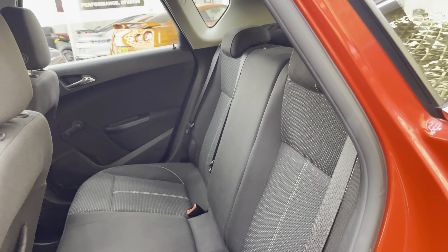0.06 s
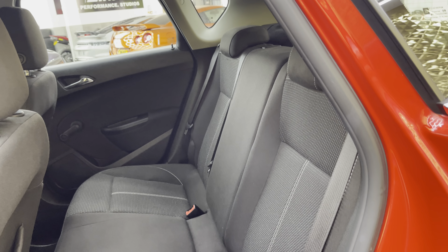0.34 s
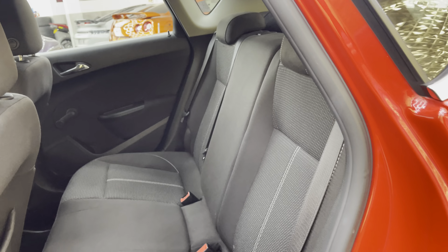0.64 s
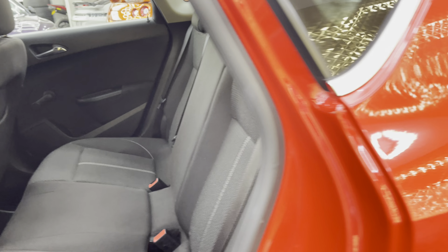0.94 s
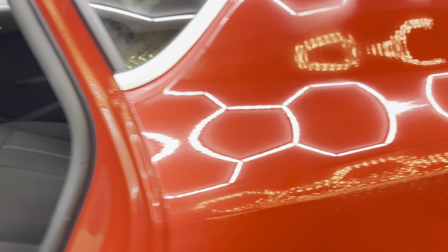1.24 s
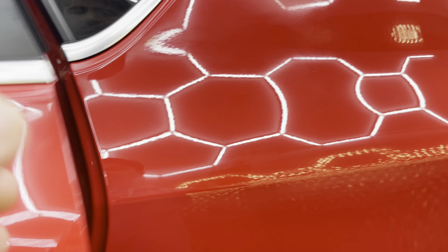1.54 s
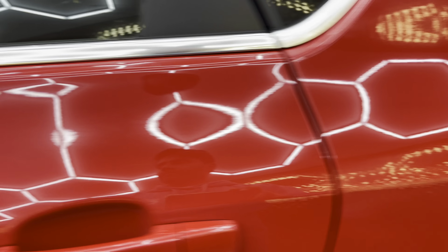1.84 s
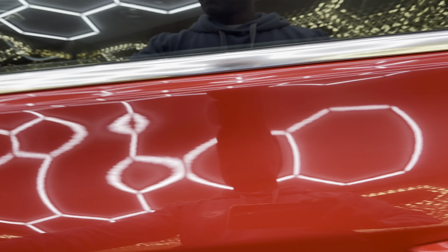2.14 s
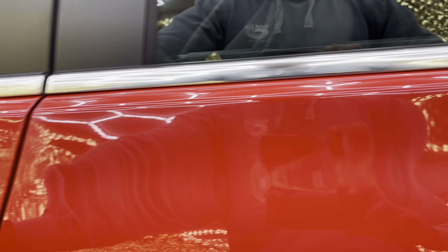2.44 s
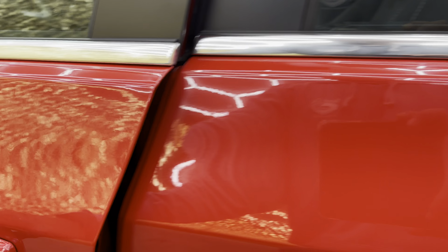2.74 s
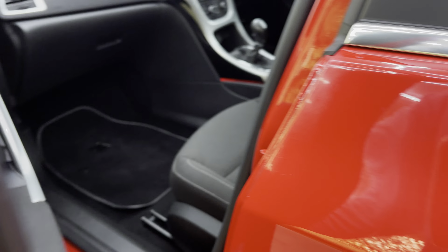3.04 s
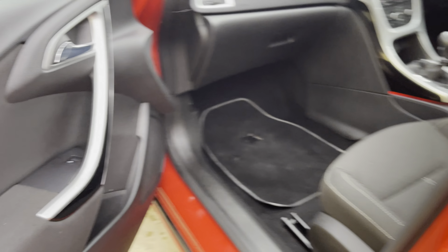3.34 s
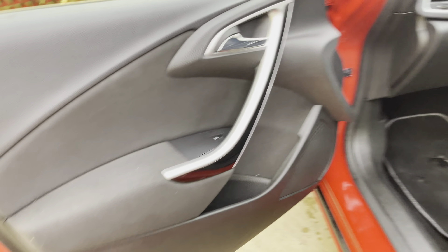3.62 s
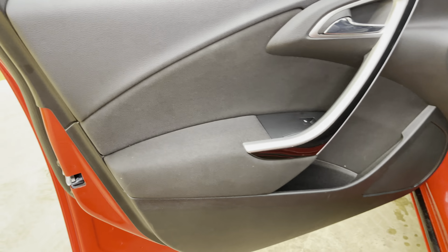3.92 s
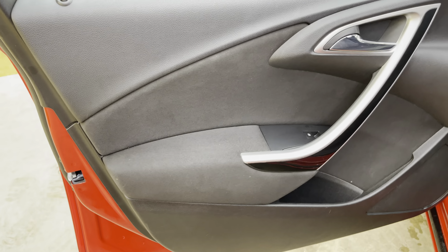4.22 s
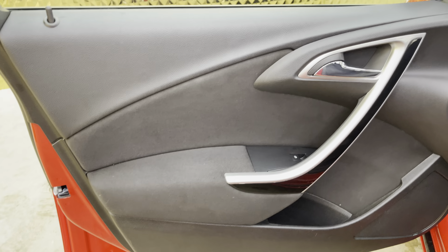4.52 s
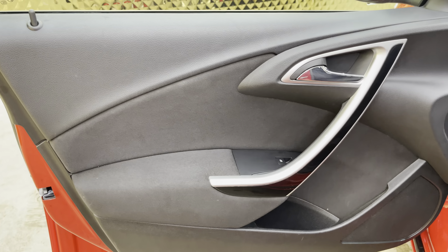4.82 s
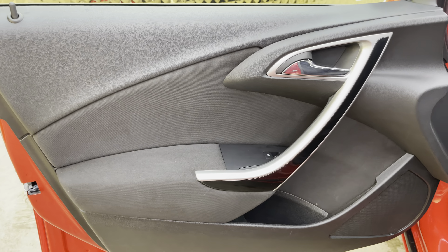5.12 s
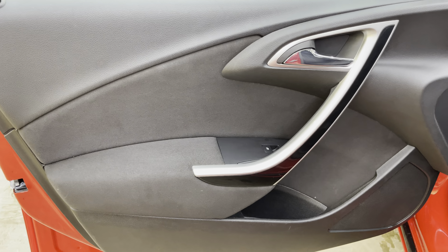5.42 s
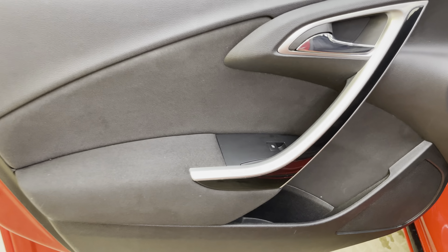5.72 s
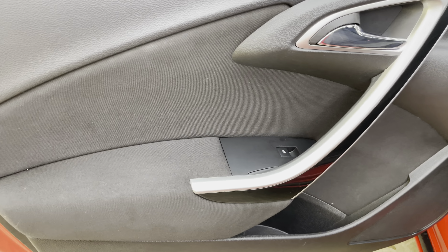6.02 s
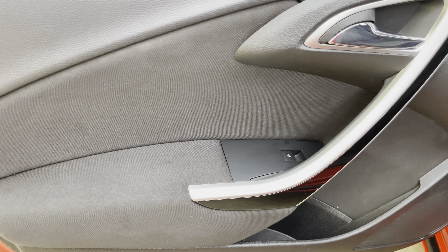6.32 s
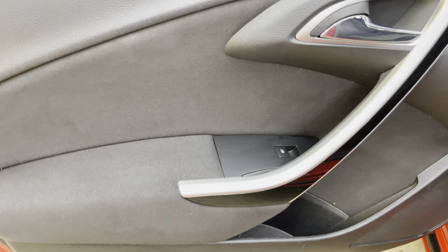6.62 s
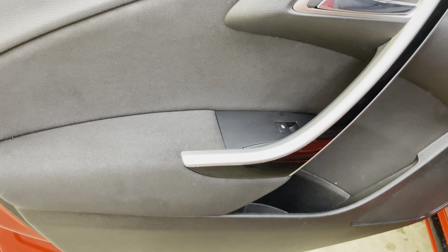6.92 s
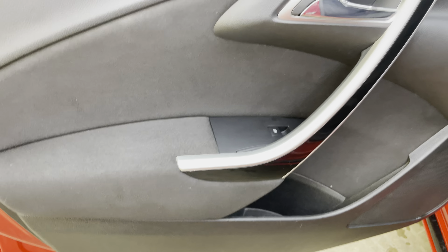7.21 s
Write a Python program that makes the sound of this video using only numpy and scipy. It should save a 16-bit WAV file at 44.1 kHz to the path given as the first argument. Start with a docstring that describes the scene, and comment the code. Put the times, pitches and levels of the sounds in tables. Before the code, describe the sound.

Quiet ventilation runs throughout in a hard-walled showroom, heard from a microphone carried close along a parked car. A faint creak comes at 0.5 seconds, then a soft scrape, rustling clothes, small ticks and a footfall around 1.1. At 1.6 the rear door slams, the loudest sound, with a short metallic ring, a deep cabin boom and about a second of echo. Dull footsteps follow around 2 seconds. At 2.6 the front handle is pulled with a clunk and a swish. The latch lets go near 3.1, a sharp clack follows at 3.25, and the opening door clunks again at 3.6. It knocks more softly against its stop at 4.5. Then it is quiet apart from a few light ticks. Around 6.5 seconds something slides softly far off in the hall, leaving a faint, wavering hum that fades at about 7.4.

```python
"""Someone carries a microphone along a parked car in a hard-walled showroom. Over quiet ventilation come
a faint creak and a soft scrape, then rustling clothes, small ticks and footfalls. The rear door slams:
its skin rings and the cabin air booms. A few steps on, the front handle is pulled, the latch lets go,
and the door clunks through two notches of its check strap and against its stop.
Last, something slides far off in the hall and leaves a faint hum."""
import sys
import numpy as np
from scipy import signal
from scipy.fft import rfft, irfft, next_fast_len
from scipy.io import wavfile
from scipy.ndimage import uniform_filter1d, minimum_filter1d

SR = 44100
rng = np.random.default_rng(int(sys.argv[2]) if len(sys.argv) > 2 else 0)


def bounce(signal):
    """Save signal as a 16-bit WAV file at the path given by the first command-line argument."""
    frames = np.transpose(np.atleast_2d(signal))
    limited = np.clip(frames, -1, 1)
    pcm = np.round(limited * 32767).astype(np.int16)
    wavfile.write(sys.argv[1], SR, pcm)


N = 329194
TIME = np.arange(N) / SR
EDGES = 28 * 2 ** np.arange(0, 9.1, .5)   # half-octave bands, f/Hz
CENTRES = np.sqrt(EDGES[1:] * EDGES[:-1])
BANK = [signal.butter(2, pair, "band", fs=SR, output="sos") for pair in zip(EDGES, EDGES[1:])]

# tone colours: f/Hz, relative level/dB
VENT_COLOUR = [(25, -18), (50, 0.5), (120, -4), (185, -8.5), (280, -14.5), (400, -16), (520, -23),
               (750, -20), (1050, -22), (1600, -26), (2700, -27.5), (4000, -35), (7000, -46.5),
               (12000, -53.5)]
CREAK_COLOUR = [(80, -52.5), (250, -54.5), (600, -52), (1100, -58.5), (1900, -60), (3000, -65.5),
                (4500, -73.5), (8000, -62.5), (12000, -107)]
SCRAPE_COLOUR = [(400, -33), (800, -9), (950, 2), (1150, -7.5), (2000, -32.5)]
RUB_COLOUR = [(20, -24), (80, -3), (250, 2.5), (600, 0.5), (1100, -11), (2500, -17), (5000, -30),
              (12000, -44)]
HISS_COLOUR = [(800, -24.5), (2500, -4), (4000, 0), (6000, -2), (8000, -8.5), (11500, -6), (16000, -17)]
TICK_COLOUR = [(60, -18.5), (300, -2), (900, -3.5), (2000, 0), (7000, 2.5), (12000, 7)]
PANEL_COLOUR = [(40, -10), (90, -7.5), (170, -1.5), (350, 1.5), (600, 1.5), (1000, -1), (1600, 3.5),
                (2500, 3), (4400, -2), (6300, -12), (8500, -10.5), (12000, -8.5)]   # dense panel vibration behind a blow
SCATTER_COLOUR = [(200, -11), (1500, -14), (4000, -19), (10000, -24)]   # after-sound off nearby surfaces
SLIDE_COLOUR = [(100, -8.5), (190, 2), (300, -6), (550, -3), (800, -6), (1200, -7.5), (1800, -8),
                (2700, -15.5), (4000, -27), (9000, -46), (14000, -69.5)]
REVERB_COLOUR = [(50, -11), (150, -14), (280, -11), (450, -12), (750, -9), (1500, -11), (2300, -11),
                 (4000, -16), (6000, -12.5), (10000, -23.5)]

# swells of clothes rustle and front-door tails: peak t/s, rub level/dB, hiss level/dB, half length/s
SWISHES = [(0.862, -60.5, -78.5, 0.45), (1.125, -49.5, -66, 0.11), (1.32, -53, -64.5, .16),
           (1.553, -49, -82.5, 0.57), (2.129, -58, -55.5, 0.095), (2.29, -65, -56.5, 0.084),
           (2.646, -38.5, -50.5, 0.08), (2.887, -65, -65, 0.093), (3.127, -36.5, -55.5, 0.073),
           (3.667, -34, -53.5, 0.071), (3.836, -53, -62.5, 0.091), (5.9, -67.5, -76.5, .4)]
# ticks of trim, zip and shoes: t/s, force level at 4500 Hz/dB, tilt/(dB per octave), t60/s
TICKS = [(0.9605, -60, 2, .2), (1.0216, -67, 4, 0.032), (1.073, -66, 4.5, .05), (1.4103, -59, -5, 0.044),
         (2.0884, -56.5, 2, 0.03), (2.137, -66, 6, .04), (3.3076, -42, -2, 0.04226),
         (3.6685, -49.5, -4.5, 0.069), (4.5168, -71.5, 13, 0.053), (5.92, -74, -3.5, .1),
         (6.2992, -66, -12, 0.046), (6.6601, -54, -4, 0.073)]
# modes of the plastic trim: f/Hz, level over the tick/dB, t60/s
TRIM_MODES = [(228, -8, 0.1), (1063, 1.5, .06), (1700, -3.5, 0.025), (2580, 5.5, .045)]
# footfalls and soft bumps: t/s, level/dB, starting f/Hz, rise/s, t60/s
THUDS = [(1.122, -33, 115, 0.0066, 0.76), (1.859, -32, 215.6, 0.031, .3), (1.991, -22.5, 59.8, 0.027, 0.19),
         (2.034, -14, 199.7, 0.03, .07), (2.165, -22.5, 179.4, 0.019, 0.53), (3.089, -34, 100, 0.015, 0.26)]
# door hits (rear: seal, latch, landing, lock; front: handle, latch, seal, two notches, stop):
# t/s, force level at 600 Hz/dB, tilt/(dB per octave), cut-off f/Hz, t60/s,
# then the struck part's note: f/Hz, level/dB, t60/s
BLOWS = [(1.590, -51.5, -2, 4096, .2, 710, -47, .1), (1.6161, -19, -0.54, 3836, .1, 678.5, -8, .2),
         (1.6282, -13.5, -2, 4228, 0.14, 134, -6.5, .3), (1.6353, -15, -1.5, 5500, 0.15, 287, -11, .25),
         (1.6556, -8, -0.5, 4500, 0.03, 1050, 1.5, .03), (2.577, -48.5, -9, 9000, .15, 303, -38.5, .15),
         (2.6477, -27.5, -4, 3030, .1, 435.2, -18.5, 0.17), (2.666, -35, -5.5, 2428, .24, 241.9, -18, .22),
         (3.0128, -48.5, -2, 4986, 0.063, 198, -36.5, .22), (3.145, -34, 2, 3173, .095, 2100, -37.5, .04),
         (3.156, -30.5, -6.5, 2110, .16, 1068, -28.5, .095), (3.174, -36, -7, 2100, .09, 229.3, -17.5, .18),
         (3.244, -43.5, 6, 2300, .07, 2280, -32, .04), (3.2535, -20.5, -2, 7000, .05, 554, -7.5, .077),
         (3.2562, -25.5, 1.5, 9240, .04, 3943, -17.5, .018),
         (3.2567, -15, 0.5, 2677, 0.054, 735, -13, 0.071), (3.5818, -25.5, 2, 2400, .15, 1607, -21, 0.042),
         (3.586, -34.5, 0.5, 2400, 0.068, 380, -16.5, 0.062), (4.518, -29, 2.5, 1500, 0.15, 749, -31, 0.23),
         (4.527, -38.5, 3, 1300, 0.17, 174, -39, 0.21)]
# modes of the two door skins: f/Hz, relative level/dB, t60/s
REAR_SKIN_MODES = [(144.96, -3.5, 0.24), (199, -5, 0.52), (215.7, -4.5, 0.26), (296, 1, 0.35),
                   (430, -16, .25), (487, -13, .2), (568, -1.5, 0.1), (712, -9.5, 0.3), (811, -17, .5),
                   (935, -13.5, .5), (1095, -15, .5), (1280, -8, 0.26), (1510, -26, .4)]
FRONT_SKIN_MODES = [(387, -8, 0.55), (528, -7.5, 0.41), (617, -11, 0.55), (663, -12.5, 0.52),
                    (814, -11, 0.5), (1110, -8.5, 0.22), (1189, -4, 0.18), (1344, -15, 0.38),
                    (1414, -15.5, 0.45), (1583, -13.5, 0.22), (1830, -14.5, 0.25), (1950, -15.5, 0.25),
                    (2220, -14.5, 0.78), (2340, -13.5, 0.34), (2655, -14.5, 0.25), (2870, -14.5, 0.2),
                    (3120, -14.5, .15)]
# the door hits travel from left to right: t/s, right ear lag/ms
DOOR_BEARING = [(1.6, 0.27), (3.25, 0.18), (3.58, 0), (4.52, -0.39)]
# a door pushes or draws the cabin's air: t/s, level/dB
AIR_PUSHES = [(1.628, -3), (1.826, -31), (2.641, -24.5), (3.146, -27), (3.594, -41), (3.719, -40),
              (4.522, -46)]
# air modes of the cabin: f/Hz, relative level/dB, rise/s, t60/s
CABIN_MODES = [(47.6, -2.5, 0.004, .28), (66.4, -2.5, .014, 0.61), (88, -0.5, 0.065, .42)]

# panel damping: f/Hz, factor on a contact's t60
DECAY_FACTOR = [(60, 2.7), (250, 1.2), (1000, 0.99), (4000, 0.74), (12000, 1.1)]
# showroom decay: f/Hz, t60/s
REVERB_T60 = [(60, 2.8), (250, 0.94), (700, 1.18), (2000, 1.31), (4500, 1.4), (11000, 0.99)]
# stereo image, close up and in the room: f/Hz, likeness of the ears (clipped to 0 = wide, 1 = mono)
NEAR_LIKENESS = [(100, 1.5), (600, 0.17), (1500, 0.4), (4000, -0.01), (12000, -0.5)]
ROOM_LIKENESS = [(60, .75), (140, .75), (290, 0.69), (640, 0.079), (1400, 0), (6000, 0.12), (12000, 0.055)]
# pan of close sounds: f/Hz, level of left over right/dB
BALANCE = [(100, 1.5), (550, 1.5), (1100, 3), (2000, -4), (4000, 6), (8000, 1.5)]


def from_db(db):
    """Decibels to gain."""
    return 10 ** (np.asarray(db) / 20)


def at_hz(points, hz):
    """Read a table on a log-frequency axis."""
    return np.interp(np.log(hz), np.log(np.array(points)[:, 0]), np.array(points)[:, 1])


def fade(t, t60):
    """Exponential decay, 60 dB down at t60."""
    return np.exp(-np.log(1000) * t / t60)


def swell(full_s, db, attack_s, hold_s, t60):
    """Attack, hold and release, as a gain."""
    attack = np.clip(1 + (TIME - full_s) / attack_s, 0, 1)
    return from_db(db) * attack * fade(np.maximum(TIME - full_s - hold_s, 0), t60)


def add(out, s, sound):
    """Mix a sound in from time s."""
    start = max(int(s * SR), 0)
    out[:, start:start + sound.shape[-1]] += sound[..., :N - start]


def two_ears(left, right, lag_ms):
    """Sound from the left reaches the right ear later."""
    t = TIME[:len(left)]
    return np.array([left, np.interp(t - lag_ms / 1000, t, right, left=0)])


def steady_noise(colour, likeness):
    """A stereo noise bed of a given colour, rms 1."""
    size = next_fast_len(N, real=True)
    hz = np.maximum(np.fft.rfftfreq(size, 1 / SR), 1)
    gains, alike = from_db(at_hz(colour, hz)), np.clip(at_hz(likeness, hz), 0, 1)
    white = rfft(rng.standard_normal((2, size)))
    mid, side = irfft(white * gains * np.sqrt([1 + alike, 1 - alike]), size)[:, :N]
    ears = np.array([mid + side, mid - side])
    return ears / ears.std()


def band_noises(size, likeness, run_in=4000):
    """Half-octave bands of stereo noise, rms about 1 each: bands x ears x samples."""
    white, out = rng.standard_normal((2, 2, size + run_in)), []
    for k, sos in enumerate(BANK):
        makeup = np.sqrt(SR / 2 / (EDGES[k + 1] - EDGES[k]))
        mid, side = signal.sosfilt(sos, white[k % 2])[:, run_in:] * makeup
        alike = np.clip(at_hz(likeness, CENTRES[k]), 0, 1)
        out.append(np.sqrt((1 + alike) / 2) * mid + np.sqrt((1 - alike) / 2) * side * [[1], [-1]])
    return np.array(out)


def dying_bands(envelope, likeness):
    """Band noises under their envelopes, each carrying just its envelope's energy."""
    bands = envelope[:, None] * band_noises(envelope.shape[1], likeness)
    makeup = np.sqrt(2 * np.sum(envelope ** 2, axis=1) / np.sum(bands ** 2, axis=(1, 2)))
    return bands * makeup[:, None, None]


def contact(band_db, t60, lag_ms=0, scatter_t60=.2):
    """Countless panel modes swell within a cycle or so and die; floor and car body scatter a dull tail."""
    t, hz = TIME[:SR // 4], CENTRES[:, None]
    direct = fade(t, t60 * at_hz(DECAY_FACTOR, hz))
    scattered = from_db(at_hz(SCATTER_COLOUR, hz)) * fade(t, scatter_t60)
    envelope = (1 - np.exp(-t * hz)) * np.hypot(direct, scattered)
    ear_gains = from_db(band_db[:, None] + at_hz(BALANCE, hz) * [1, -1] / 2)
    left, right = np.einsum("be,bet->et", ear_gains, dying_bands(envelope, NEAR_LIKENESS))
    return two_ears(left, right, lag_ms)


def resonance(hz, db, rise, t60, lag_ms):
    """One mode, steady or gliding, pushed up over its rise time and left to die."""
    t = TIME[:SR]
    push = np.sin(np.pi / 2 * np.minimum(t / rise, 1)) ** 2
    phase = 2 * np.pi * np.cumsum(hz * np.ones(SR)) / SR
    wave = from_db(db) * push * fade(np.maximum(t - rise, 0), t60) * np.sin(phase)
    left_gain = from_db(at_hz(BALANCE, hz) / 2)
    return two_ears(wave * left_gain, wave / left_gain, lag_ms)


def tilted(db, tilt_db, hz, low_hz, pivot_hz, high_hz):
    """A level that slopes by the octave between two frequencies."""
    return db + tilt_db * np.log2(np.clip(hz, low_hz, high_hz) / pivot_hz)


def blow_force(db, tilt_db, cut_hz, hz, steepness=7.8, high_hz=4500):
    """Force spectrum in dB: a softer contact cuts off lower."""
    softness_db = 10 * np.log10(1 + (np.minimum(hz, high_hz) / cut_hz) ** steepness)
    return tilted(db, tilt_db, hz, low_hz=200, pivot_hz=600, high_hz=high_hz) - softness_db


def ventilation(db=-56.5):
    """Moving air lays a low, steady bed of room tone."""
    return from_db(db) * steady_noise(VENT_COLOUR, ROOM_LIKENESS)


def creak(start_s=.5, end_s=.645, slips_per_s=150, jitter=.35, gain_db=-3.5):
    """One short run of nearly even stick-slip that swells and dies."""
    slips = np.zeros((1, N))
    even_s = np.arange(start_s, end_s, 1 / slips_per_s)
    slip_s = even_s + jitter / slips_per_s * rng.standard_normal(len(even_s))
    strength = np.sqrt(np.abs(np.sin(np.pi * (even_s - start_s) / (end_s - start_s))))
    slips[0, (slip_s * SR).astype(int)] = strength
    grain = contact(gain_db + at_hz(CREAK_COLOUR, CENTRES), t60=.07)
    return signal.fftconvolve(slips, grain, axes=1)[:, :N]


def scrape():
    """Something slides softly before the first step: a narrow band of friction noise."""
    envelope = swell(full_s=.82, db=-63.5, attack_s=.12, hold_s=.08, t60=.7)
    return envelope * steady_noise(SCRAPE_COLOUR, ROOM_LIKENESS)


def swishes(drop_db=10.5):
    """Short swells of rub and hiss: rustling clothes, and the dull rush after the front door's
    handle, latch and notch."""
    rub, hiss = np.zeros((2, N))
    for s, rub_db, hiss_db, half_length in SWISHES:
        swish = from_db(np.maximum(-drop_db * np.abs(TIME - s) / half_length, -100))
        rub = np.maximum(rub, from_db(rub_db) * swish)
        hiss = np.maximum(hiss, from_db(hiss_db) * swish)
    return rub * steady_noise(RUB_COLOUR, ROOM_LIKENESS) + hiss * steady_noise(HISS_COLOUR, NEAR_LIKENESS)


def ticks():
    """Light, bright touches that ring the plastic trim."""
    out = np.zeros((2, N))
    for s, db, tilt_db, t60 in TICKS:
        force_db = tilted(db, tilt_db, CENTRES, low_hz=1700, pivot_hz=4500, high_hz=10000)
        add(out, s, contact(force_db + at_hz(TICK_COLOUR, CENTRES), t60))
        for hz, mode_db, mode_t60 in TRIM_MODES:
            ring_db = np.interp(hz, CENTRES, force_db) + mode_db
            add(out, s, resonance(hz, ring_db, rise=.0005, t60=mode_t60, lag_ms=.05))
    return out


def thuds(end_hz=55.5, sag_s=.024, scuff_db=-13):
    """Footfalls and soft bumps: a dull scuff over a low note that sinks as the weight settles."""
    out = np.zeros((2, N))
    force_db = blow_force(db=0, tilt_db=-10, cut_hz=460, hz=CENTRES)
    scuff_colour = scuff_db + force_db - force_db.max() + at_hz(PANEL_COLOUR, CENTRES)
    for s, db, start_hz, rise, t60 in THUDS:
        hz = end_hz + (start_hz - end_hz) * np.exp(-TIME[:SR] / sag_s)
        add(out, s, resonance(hz, db, rise, t60, lag_ms=1.0))
        add(out, s, contact(db + scuff_colour, t60=.1))
    return out


def door_skin(modes, db, tilt_db, cut_hz, blow_t60, spread_db=4.0, longest_t60=.5):
    """The door's skin rings with the force of a blow, in a fresh mix of its modes each time."""
    t = TIME[:SR // 2]
    hz, mode_db, mode_t60 = np.transpose(modes)
    coupling_db = -7.5 + 6 * np.log2(blow_t60 / .054)   # a longer blow rings it harder
    ring_db = blow_force(db, tilt_db, cut_hz, hz) + coupling_db + mode_db
    strengths = from_db(ring_db + spread_db * rng.standard_normal(len(hz))) * rng.choice([-1, 1], len(hz))
    decays = fade(t, np.minimum(mode_t60, longest_t60)[:, None])
    return strengths @ (np.sin(2 * np.pi * hz[:, None] * t) * decays)


def doors(front_from_s=2.5, front_skin_db=-4.5, note_rise_cycles=.8):
    """Each hit layers a clatter of latch and trim, the struck part's short note and the skin's ring."""
    out = np.zeros((2, N))
    for s, db, tilt_db, cut_hz, t60, note_hz, note_db, note_t60 in BLOWS:
        lag_ms = np.interp(s, *np.transpose(DOOR_BEARING))
        clatter_db = blow_force(db, tilt_db, cut_hz, CENTRES) + at_hz(PANEL_COLOUR, CENTRES)
        add(out, s, contact(clatter_db, t60, lag_ms))
        add(out, s, resonance(note_hz, note_db, note_rise_cycles / note_hz, note_t60, lag_ms=.05))
        modes, skin_db = (REAR_SKIN_MODES, 0) if s < front_from_s else (FRONT_SKIN_MODES, front_skin_db)
        ring = door_skin(modes, db + skin_db, tilt_db, cut_hz, t60)
        add(out, s, two_ears(ring, ring, lag_ms))
    return out


def cabin_boom():
    """Every push or pull of a door sets the same deep air modes swinging."""
    out = np.zeros((2, N))
    boom = sum(resonance(hz, db, rise, t60, lag_ms=.47) for hz, db, rise, t60 in CABIN_MODES)
    for s, db in AIR_PUSHES:
        add(out, s, from_db(db) * boom)
    return out


def far_slide():
    """Something slides far off: dark friction noise with the long release of the hall."""
    envelope = swell(full_s=6.55, db=-52, attack_s=.18, hold_s=.14, t60=1.8)
    return envelope * steady_noise(SLIDE_COLOUR, ROOM_LIKENESS)


def far_hum(hz=366, waver_hz=9):
    """The slide leaves one faint, wavering tone hanging."""
    knots = TIME[::SR // 20]
    pitch = hz + waver_hz * np.interp(TIME, knots, rng.standard_normal(len(knots)))
    envelope = swell(full_s=6.64, db=-59.5, attack_s=.18, hold_s=.3, t60=2.3)
    return envelope * np.sin(2 * np.pi * np.cumsum(pitch) / SR)


def showroom_reverb(x, onset_s=.0081):
    """The long tail of the hall builds up once the first walls answer."""
    t, hz = TIME[:SR * 3 // 2], CENTRES[:, None]
    envelope = (1 - np.exp(-(t / onset_s) ** 2)) * fade(t, at_hz(REVERB_T60, hz))
    envelope = envelope / np.linalg.norm(envelope, axis=1, keepdims=True)
    gains = from_db(at_hz(REVERB_COLOUR, CENTRES)) * np.sqrt(2 * np.diff(EDGES) / SR)
    impulse_response = np.tensordot(gains, dying_bands(envelope, ROOM_LIKENESS), 1)
    return signal.fftconvolve(x, impulse_response, axes=1)[:, :N]


def scene(lows_send_db=-10.0):
    """The mix: knocks feed the reverb in full, the low end more gently, the bed not at all."""
    bed = far_hum() + ventilation() + far_slide() + swishes() + scrape()
    knocks = doors() + ticks() + creak()
    lows = cabin_boom() + thuds()
    return bed + knocks + lows + showroom_reverb(knocks + from_db(lows_send_db) * lows)


def limiter(x, threshold_db=-7.0, release_db_per_s=32.0, window_samples=131, full_scale=.94):
    """The gain ducks under a loud burst and climbs back steadily; spikes that slip by are soft-clipped."""
    power = uniform_filter1d(np.mean(x ** 2, axis=0), window_samples)
    over_db = np.maximum(10 * np.log10(np.abs(power) + 1e-12) - threshold_db, 0)
    release_db = release_db_per_s * TIME
    duck_db = np.maximum.accumulate(over_db + release_db) - release_db
    gain_db = uniform_filter1d(minimum_filter1d(-duck_db, window_samples), window_samples)
    held = x * from_db(gain_db)
    return held / (1 + (held / full_scale) ** 6) ** (1 / 6)


def record(dry, notch_hz=10150, peak_hz=11500, peak_mix_db=-8.0, port_q=12.0,
           low_cut_hz=33, high_cut_hz=12250, final_cut_hz=15600):
    """The microphone ports notch and lift the treble; both ends are rolled off; a limiter holds peaks."""
    notch = signal.iirnotch(notch_hz, port_q, fs=SR)
    x = signal.lfilter(*notch, signal.lfilter(*notch, dry))
    x = x + from_db(peak_mix_db) * signal.lfilter(*signal.iirpeak(peak_hz, port_q, fs=SR), x)
    x = signal.sosfilt(signal.butter(16, high_cut_hz, fs=SR, output="sos"), x)
    x = signal.sosfilt(signal.butter(2, low_cut_hz, "high", fs=SR, output="sos"), x)
    return signal.sosfilt(signal.ellip(10, .1, 80, final_cut_hz, fs=SR, output="sos"), limiter(x))


dry = scene()
out = record(dry)
bounce(out)
```